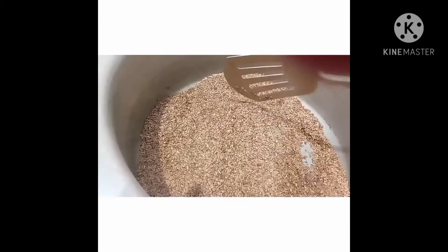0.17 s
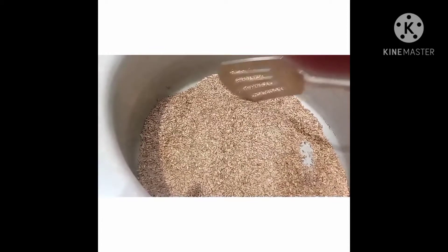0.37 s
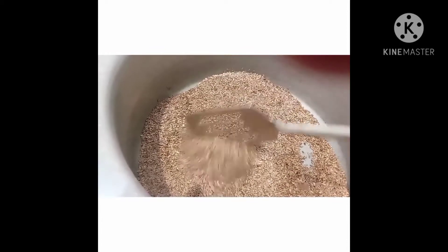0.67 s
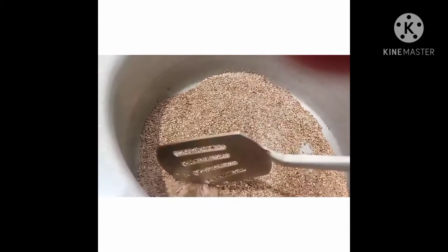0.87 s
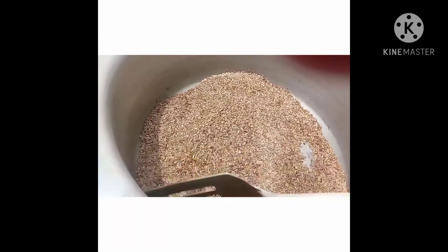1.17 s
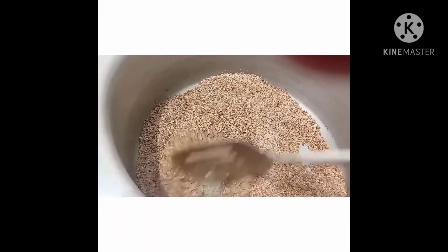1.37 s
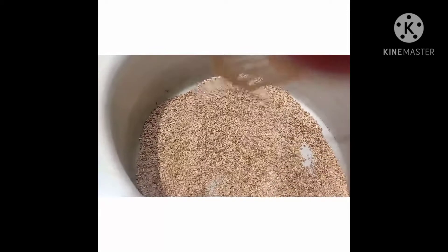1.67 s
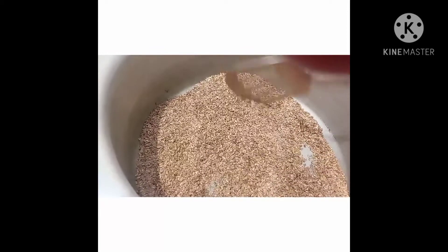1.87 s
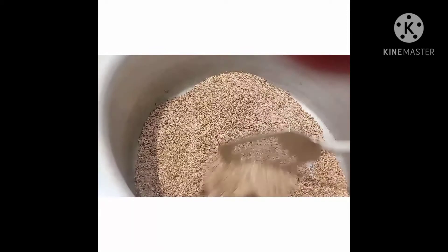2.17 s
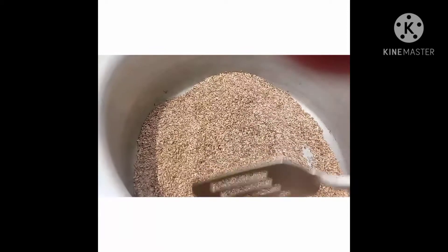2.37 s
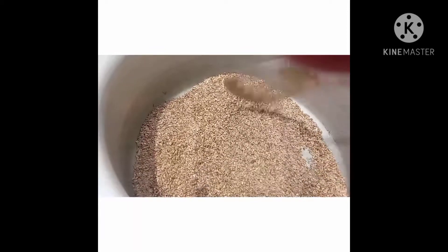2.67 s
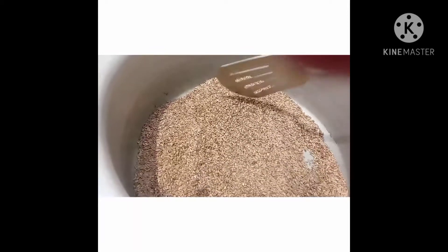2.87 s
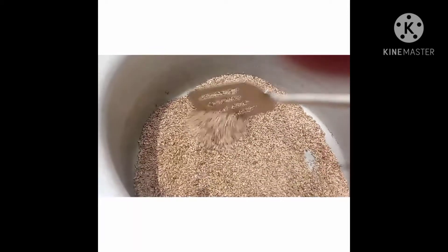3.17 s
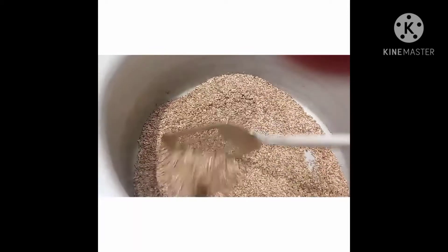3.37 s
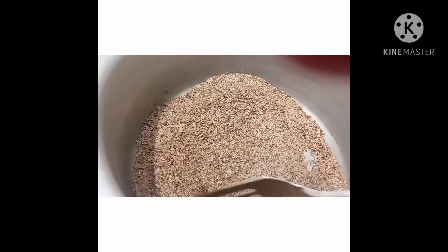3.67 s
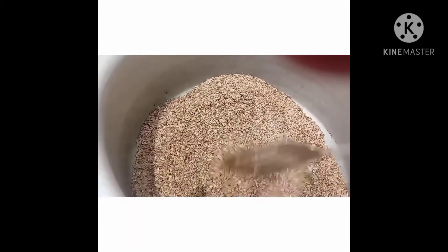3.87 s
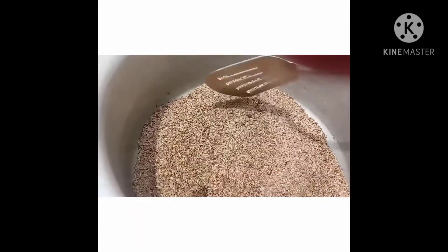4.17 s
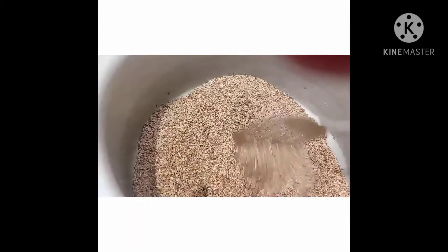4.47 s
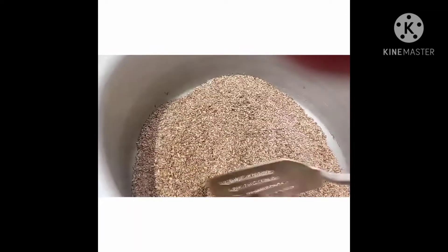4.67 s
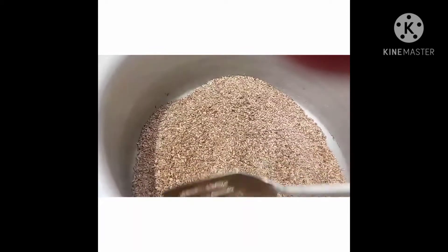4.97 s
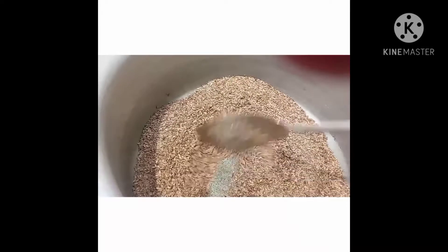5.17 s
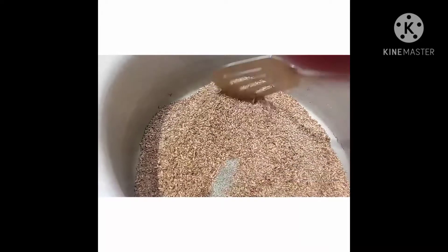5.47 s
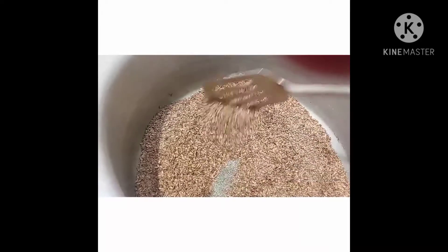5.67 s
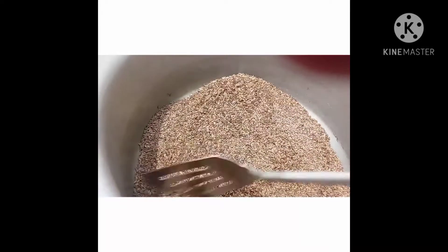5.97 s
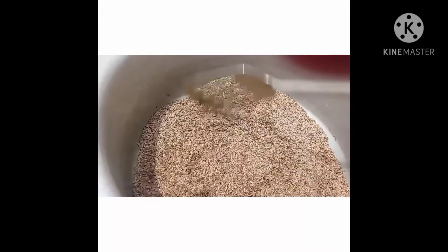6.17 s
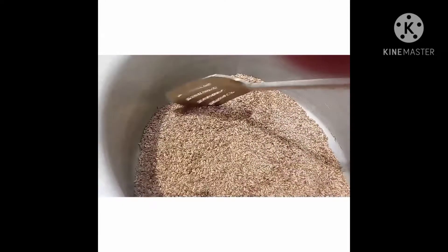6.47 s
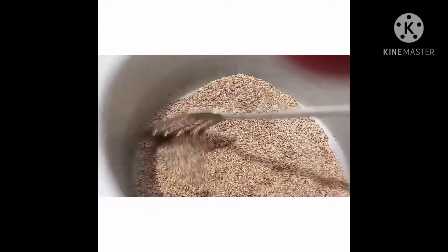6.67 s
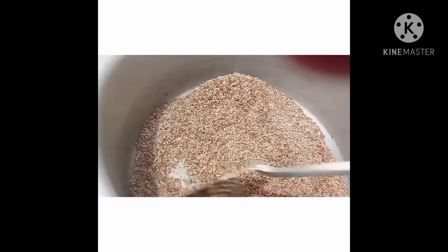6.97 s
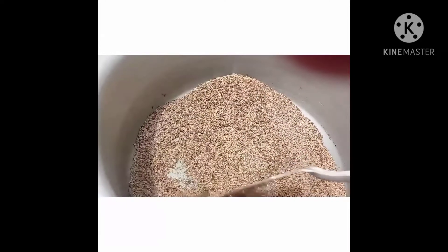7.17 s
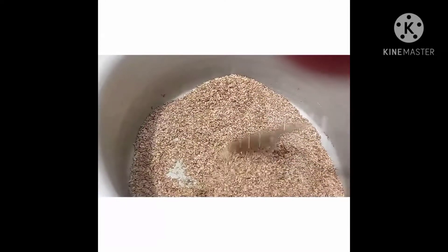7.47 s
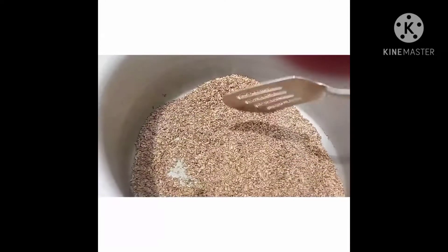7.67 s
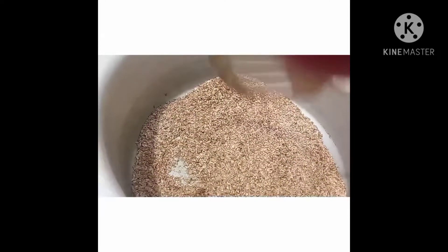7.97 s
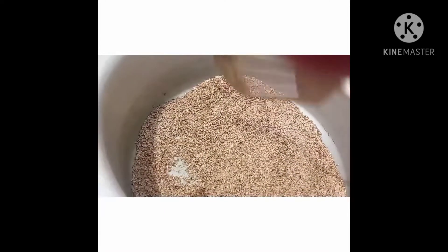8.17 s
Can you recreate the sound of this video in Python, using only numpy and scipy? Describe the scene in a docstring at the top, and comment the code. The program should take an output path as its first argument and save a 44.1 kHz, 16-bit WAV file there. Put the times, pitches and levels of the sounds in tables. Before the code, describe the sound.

Bright snaps and pops come thick and fast from hot seeds close to the microphone, the strongest landing with a little thump. A fine patter of smaller bursts and the gentle hiss of stirred grain fill the gaps. Now and then a metal spatula softly knocks the steel pot, a little more clearly near the end, while the popping keeps going.

```python
"""Seeds roasting in a steel pot

Small seeds burst with short cracks over the hiss of stirred, sliding grain, close under a phone whose
two microphone ports each colour the sound differently. The hardest cracks jolt a capsule's resting
point, which the bass cut turns into a thud. The pot murmurs, and now and then the spatula bumps it."""
import sys
import numpy as np
from scipy import signal
from scipy.fft import rfft, irfft
from scipy.io import wavfile
from scipy.ndimage import uniform_filter1d

SR = 44100
rng = np.random.default_rng(int(sys.argv[2]) if len(sys.argv) > 2 else 0)


def pcm_store(signal):
    """Save signal as 16-bit PCM."""
    levels = np.round(np.clip(np.atleast_2d(signal), -1, 1) * 32767)
    wavfile.write(sys.argv[1], SR, levels.astype(np.int16).T)


N = 366030


def undb(db):
    """Decibels to gain."""
    return 10 ** (np.asarray(db) / 20)


def walk(rate_hz):
    """A random wander: glides to a new level rate_hz times a second, with a spread near 1."""
    hold = int(SR / rate_hz)
    return uniform_filter1d(np.repeat(rng.standard_normal(N // hold + 1), hold), hold)[:N]


def colour(x, response):
    """Filter each channel with its impulse response."""
    return signal.fftconvolve(x, response, axes=1)[:, :x.shape[1]]


def eq_response(curve):
    """A minimum-phase impulse response of unit energy, shaped by (freq_hz, gain_db) points."""
    hz, db = np.transpose(curve)
    grid_hz = np.maximum(np.arange(1025) * SR / 2048, 20)
    cepstrum = irfft(np.log(undb(np.interp(np.log(grid_hz), np.log(hz), db))))
    cepstrum[1:1024] *= 2  # folding the cepstrum makes the response causal
    cepstrum[1025:] = 0
    response = irfft(np.exp(rfft(cepstrum)))[:512]
    return response / np.linalg.norm(response)


# Tone of each microphone port: freq_hz, gain_db
LEFT_PORT_EQ = [(300, -15), (600, -9.5), (1900, -12), (3500, -6.5), (5000, -3.5), (6500, -1), (7700, -8),
                (10500, -3.5), (13300, -7), (14050, -6.5), (14700, 3.5), (15300, 2), (15600, -7)]
RIGHT_PORT_EQ = [(300, -23), (600, -15.5), (1000, -16), (1400, -14.5), (3500, -4), (5000, 2), (6500, 7.5),
                 (7700, -2.5), (11000, -12), (13500, -14.5), (14700, -11.5), (15300, -6), (15600, -18.5)]


def ports():
    """The resonant cavities in front of the left and right capsules."""
    return np.array([eq_response(LEFT_PORT_EQ), eq_response(RIGHT_PORT_EQ)])


# Swell of the stirring: time_s, level_db
STIR_LEVELS = [(0.0, -40.5), (0.51, -40), (1.23, -39), (1.71, -41), (2.22, -41.5), (2.58, -45), (2.68, -35),
               (2.77, -43), (3.26, -41), (3.74, -41.5), (4.76, -42.5), (4.88, -38), (5.36, -44),
               (5.73, -39), (6.17, -43), (6.47, -41.5), (6.91, -41), (7.44, -40.5), (8.3, -40)]


def bustle_db(t):
    """Level of the moving grain: the stirring, lifted where crowds of loud bursts scatter the seeds."""
    scatter_db, scatter_s = 2.5, 0.23
    crowd = sum(np.exp(-((t - start_s) / scatter_s) ** 2) for start_s, _, _ in LOUD_BURSTS)
    return np.interp(t, *np.transpose(STIR_LEVELS)) + scatter_db * (np.sqrt(crowd) - 2)


# Tone of sliding grain, thinner in the bass than a crack: freq_hz, gain_db
GRAIN_EQ = [(200, 1.5), (820, 1.5), (1000, 2), (1300, 0.5), (2500, 12), (12000, 5)]


def sliding_grain():
    """Thousands of seeds slide and tick on each other: a hiss whose bands flicker together and alone."""
    grid_s = np.arange(0, N / SR + .01, .01)
    level_db = np.interp(np.arange(N) / SR, grid_s, bustle_db(grid_s)) + 2.5 * walk(40.)
    ticks = rng.standard_normal((2, N)) * undb(3.0 * walk(600.))
    lows = [signal.sosfilt(signal.butter(2, hz, fs=SR, output="sos"), ticks)
            for hz in (700, 1500, 3000, 8000, 12000)]
    bands = np.diff([0 * ticks, *lows, ticks], axis=0)
    flicker = sum(band * undb(2.8 * walk(35.)) for band in bands)
    hiss = colour(flicker, eq_response(GRAIN_EQ)[None])
    return undb(level_db) * colour(hiss, ports()) * undb([[1.5], [-1.5]])  # leans left


def cracks(starts_s, levels_db, tint_db, rise_ms, snap_ms, tail_ms, tail_db=-8, body_db=0.5):
    """Each burst is a brief swell, a snap, then a short noisy tail, different at each port."""
    length, lead = 700, 150  # samples in a crack, and ahead of its snap
    snap_edge = 1.7  # height of the sharp edge over the noisy body
    tail_lift_db = np.array([[5.5], [0]])  # cracks have a stronger noisy tail on the left
    ms = (np.arange(length) - lead) * 1000 / SR
    octave = np.log2(np.maximum(np.arange(length // 2 + 1) * SR / length, 300) / 300)
    out, cavities = np.zeros((2, N + 900)), ports()
    for start_s, stereo_db in zip(starts_s, levels_db):
        size = np.exp(0.14 * rng.standard_normal())
        tail = undb(tail_db + 3.4 * rng.standard_normal() + tail_lift_db)  # some snap dry, some splutter
        swell = 0.9 * tail * np.exp(-abs(ms) / rise_ms)
        decay = np.exp(-ms / (snap_ms * size)) + tail * np.exp(-ms / (tail_ms * size))
        envelope = np.where(ms < 0, swell, decay)
        # no two husks sound alike: a random tint from octave to octave
        husk_db = tint_db * np.interp(octave, np.arange(7), rng.standard_normal(7))
        tint = undb(husk_db + body_db * (octave < 2.7))
        noise = rng.standard_normal((2, length))
        noise += snap_edge * (ms == 0) * np.sign(noise)
        burst = colour(envelope * irfft(tint * rfft(noise)), cavities)
        burst /= np.sqrt(np.mean(burst[:, 132:220] ** 2, axis=1, keepdims=True))  # 2 ms round the snap
        i = int(start_s * SR)
        out[:, i:i + length] += undb(stereo_db)[:, None] * burst
    return out[:, lead:lead + N]


# The loudest bursting seeds: start_s, left_db, right_db
LOUD_BURSTS = [(0.0089, -16, -16.5), (0.0412, -19.5, -18), (0.0733, -25, -25), (0.0808, -24, -21.5),
               (0.164, -21, -17.5), (0.1684, -27, -17.5), (0.179, -34, -21.0), (0.2088, -22, -14.5),
               (0.248, -23, -15), (0.271, -29, -19.5), (0.3208, -15.5, -13), (0.3608, -26, -19),
               (0.37, -19, -15), (0.4507, -20, -20), (0.5175, -20, -12), (0.5392, -17, -20),
               (0.5529, -29, -26), (0.5756, -22, -19), (0.6016, -24, -14), (0.7385, -20, -16.5),
               (0.798, -23.5, -19.5), (0.822, -24, -18.5), (0.837, -24.5, -21), (0.8507, -43, -25),
               (0.8657, -15.5, -13.5), (0.913, -24, -14.5), (0.9375, -23, -18.5), (0.942, -19, -22.5),
               (0.983, -25, -13.5), (0.9903, -19.5, -30), (1.0157, -33, -23.0), (1.0324, -16.5, -12),
               (1.0595, -18, -17), (1.0749, -19, -15), (1.1158, -18, -15.5), (1.15, -22, -18),
               (1.1833, -24, -19.5), (1.1965, -14, -16), (1.2323, -25.5, -23), (1.253, -16, -12),
               (1.2698, -22, -12.5), (1.2928, -21, -24), (1.3222, -24, -19), (1.3515, -22, -16),
               (1.385, -22, -19.5), (1.4139, -15.5, -11), (1.4297, -22, -17.5), (1.483, -21, -15),
               (1.501, -34, -17), (1.5054, -19, -16), (1.554, -17, -14.5), (1.5647, -30, -19),
               (1.594, -25, -15.5), (1.6367, -22, -19.5), (1.6579, -21, -16), (1.6646, -15.5, -25),
               (1.7532, -31, -15.5), (1.7889, -22, -19.5), (1.812, -22, -16.5), (1.8213, -18, -16),
               (1.8293, -24, -20), (1.8345, -23, -20), (1.844, -15, -17), (1.8577, -25, -13.5),
               (1.9256, -22.5, -19.5), (1.945, -29, -18), (1.9668, -22, -17.5), (2.0229, -17, -16.5),
               (2.0402, -23, -16), (2.097, -27, -20.5), (2.104, -20, -19.5), (2.143, -32.5, -21),
               (2.1506, -23, -18), (2.1644, -17, -15.5), (2.1783, -23, -18), (2.1849, -21, -16.5),
               (2.2233, -24, -18), (2.232, -16, -19), (2.239, -21, -15.5), (2.248, -30, -16.5),
               (2.263, -33, -19.5), (2.317, -19.5, -21), (2.356, -33, -21.5), (2.363, -30, -14.5),
               (2.3882, -33, -16.5), (2.3983, -33, -22.5), (2.4202, -22, -15), (2.4595, -35, -17),
               (2.473, -25.5, -18.5), (2.5718, -33, -21.5), (2.6046, -18.5, -15.5), (2.719, -34, -16.5),
               (2.7304, -23, -19), (2.7454, -23, -15.5), (2.8091, -20, -19), (2.8333, -25, -23),
               (2.8671, -20, -12.5), (2.884, -16.5, -21), (2.8892, -33, -22), (2.9045, -21, -17.5),
               (2.9388, -23, -18), (2.954, -21, -19), (2.9825, -40, -21.5), (3.0136, -31, -18),
               (3.0542, -17.5, -12.5), (3.058, -29, -25), (3.0792, -28, -16.5), (3.09, -20, -17),
               (3.1088, -27, -22), (3.129, -17, -16), (3.144, -24, -18), (3.1618, -39, -20),
               (3.192, -24, -14.5), (3.1992, -16, -21), (3.2072, -21, -18), (3.2163, -23, -18.5),
               (3.2756, -33, -25), (3.29, -21, -20), (3.309, -24, -18), (3.3174, -23, -24),
               (3.342, -23.5, -14.5), (3.362, -15.5, -12), (3.4034, -18.5, -16), (3.43, -25.0, -23),
               (3.435, -39, -19), (3.4585, -17, -16.5), (3.485, -22, -20.0), (3.5012, -28, -24),
               (3.5059, -16.5, -16), (3.5702, -17, -25), (3.5904, -24, -19.5), (3.6796, -18.5, -17),
               (3.702, -19.5, -15.5), (3.772, -35, -18), (3.7944, -20, -15), (3.8287, -23, -18.5),
               (3.838, -30, -21), (3.8775, -40, -25), (3.939, -45, -19), (3.9519, -24.5, -20),
               (3.9804, -26, -14), (3.991, -24, -22), (4.0165, -26, -17.5), (4.034, -17, -21),
               (4.0414, -21, -18), (4.085, -17, -15), (4.153, -29, -21.5), (4.1783, -27, -22),
               (4.2089, -14, -13), (4.25, -19.5, -13.5), (4.2542, -21, -16), (4.261, -25, -16.5),
               (4.275, -23.0, -17), (4.346, -17.5, -17.5), (4.3614, -21, -21.5), (4.3887, -24, -20),
               (4.423, -21.5, -19.5), (4.437, -25, -16.5), (4.471, -22.5, -19), (4.4792, -19, -18),
               (4.499, -21, -24), (4.5059, -26.0, -18), (4.5487, -28, -18), (4.6221, -25, -16),
               (4.6424, -19, -15.5), (4.686, -29, -23), (4.69, -16, -14), (4.6944, -22, -10),
               (4.701, -17, -17), (4.725, -24.5, -23), (4.7387, -18, -16.5), (4.7753, -20, -20),
               (4.7904, -24.0, -21), (4.8078, -26, -15), (4.817, -26, -19), (4.8275, -18.5, -15.5),
               (4.8511, -21, -15.5), (4.8754, -29, -14.5), (4.891, -24, -19), (4.9016, -31, -19),
               (4.9211, -33, -16.5), (4.9728, -24.0, -24), (4.986, -19, -12.5), (5.011, -19, -36),
               (5.0182, -29, -17), (5.0576, -16, -16.5), (5.084, -29, -22), (5.122, -17.5, -16.5),
               (5.1599, -14, -13.5), (5.164, -31, -18.5), (5.1776, -18, -14.5), (5.186, -28, -21),
               (5.1971, -14.5, -20.5), (5.243, -18, -20), (5.2457, -33, -18.5), (5.257, -35, -22),
               (5.2694, -24, -20), (5.2814, -16.5, -18), (5.2895, -22, -31), (5.317, -24, -17.5),
               (5.3297, -25, -24), (5.4034, -22, -15.5), (5.4085, -26, -18), (5.4154, -22.5, -15.5),
               (5.4503, -34, -16), (5.4587, -18.5, -21), (5.484, -21.5, -18), (5.5171, -16.5, -12),
               (5.521, -22, -17.5), (5.549, -16, -18), (5.581, -33, -26), (5.599, -17.5, -17),
               (5.6128, -16, -15), (5.622, -12, -16), (5.6325, -23, -15), (5.641, -15, -13.5),
               (5.663, -17, -23), (5.6737, -23.0, -17.5), (5.726, -21.5, -19), (5.73, -17, -17),
               (5.784, -24, -17.5), (5.817, -30, -18), (5.832, -24, -26), (5.8346, -20, -21),
               (5.8437, -22, -16), (5.848, -21.0, -19), (5.8655, -14, -17), (5.87, -25, -18),
               (5.876, -31, -22.5), (5.915, -21.0, -17.5), (5.9222, -28, -13), (5.9256, -14.5, -11.5),
               (5.9792, -34, -20), (6.0111, -33, -22.5), (6.0327, -34, -22), (6.047, -23, -18.5),
               (6.06, -23, -17.5), (6.1142, -19, -11.5), (6.1741, -21.5, -18.5), (6.205, -21, -21.5),
               (6.246, -19, -14), (6.2848, -31, -19), (6.2955, -17, -12.5), (6.318, -17.5, -16),
               (6.351, -21, -20), (6.363, -30, -22), (6.3736, -19, -13.5), (6.386, -22, -24),
               (6.396, -22, -18.5), (6.425, -19, -12), (6.444, -26, -23), (6.4816, -22, -26),
               (6.5059, -19, -17), (6.512, -33, -20.5), (6.5266, -22, -17), (6.5612, -21, -19.5),
               (6.5729, -24, -14), (6.601, -31, -22.5), (6.632, -30, -21.5), (6.641, -17, -13.5),
               (6.6472, -17, -19), (6.6603, -19, -14), (6.6751, -17, -16), (6.692, -21, -18.5),
               (6.746, -21.5, -18), (6.8124, -25, -13.5), (6.8476, -31, -18), (6.926, -19, -14.5),
               (6.936, -19, -21), (6.9476, -21, -18.5), (6.962, -21, -25), (6.9959, -19.5, -15),
               (7.0674, -19, -14.5), (7.1342, -20, -16), (7.168, -23, -16), (7.178, -15.5, -12.5),
               (7.191, -28, -17.5), (7.1948, -25, -30), (7.2107, -24, -26), (7.215, -38, -20.0),
               (7.2241, -22, -17.5), (7.329, -41, -15), (7.3447, -41, -19), (7.35, -34, -20),
               (7.3804, -30, -18), (7.3843, -35, -19), (7.4108, -21, -27), (7.42, -31, -18),
               (7.4247, -19, -14), (7.433, -20, -24), (7.46, -38, -26), (7.4702, -43, -23.5),
               (7.513, -25, -20), (7.531, -25, -17), (7.545, -19.5, -21.5), (7.563, -34, -21),
               (7.61, -37, -17), (7.6232, -23, -25), (7.647, -28, -15.5), (7.6704, -12.5, -12),
               (7.6806, -18, -15), (7.7397, -21, -19.5), (7.8161, -24, -13.5), (7.8537, -29, -19),
               (7.9336, -28.5, -16), (7.9634, -18, -15), (8.02, -29, -22), (8.028, -22, -14),
               (8.0379, -18, -16), (8.0982, -38, -14), (8.109, -30, -17.5), (8.13, -21, -24),
               (8.136, -37, -22), (8.154, -15, -12.5), (8.173, -20, -20), (8.1931, -17, -16.5),
               (8.2431, -22, -16.5), (8.2888, -27, -16.5)]


def loud_seeds():
    """Hot seeds burst with sharp foreground cracks."""
    bursts = np.array(LOUD_BURSTS)
    return cracks(bursts[:, 0], bursts[:, 1:], tint_db=3.0, rise_ms=1.3, snap_ms=0.4, tail_ms=2.8)


def small_seeds():
    """A random patter of small bursts, louder as the grain moves, with flurries round the loud ones."""
    bursts_per_s, lift_db = 55., 4.0
    flurry_share, flurry_s = .6, .03
    count = int(bursts_per_s * N / SR)
    spread = rng.standard_normal((count, 3))
    place, leader, alone = rng.random((count, 3)).T
    leader_s = np.array(LOUD_BURSTS)[(leader * len(LOUD_BURSTS)).astype(int), 0]
    nearby_s = np.clip(leader_s + flurry_s * (2 * place - 1), 0, (N - 1) / SR)
    starts_s = np.where(alone > flurry_share, place * N / SR, nearby_s)
    seed_db = bustle_db(starts_s)[:, None] + lift_db + 3.7 * np.tanh(spread[:, :1])
    stereo_db = seed_db + 2.8 * spread[:, 1:] + [-3.5, 0]  # scattered, leaning right
    return cracks(starts_s, stereo_db, tint_db=6.0, rise_ms=1.0, snap_ms=0.3, tail_ms=2.2)


# Signed kicks to the capsules' resting points: start_s, left_step_fullscale, right_step_fullscale
CAPSULE_JOLTS = [(0.209, 0.45, -0.02), (0.3199, 0.43, -0.078), (0.539, 0.21, -0.00011),
                 (0.7391, -0.29, 0.0042), (1.0749, 0.27, -0.00069), (1.116, -0.7, -0.083),
                 (1.2701, 0.75, -1.09), (1.3527, -0.46, 0.0), (1.3841, -0.66, 0.0), (1.431, 0.83, 0.0),
                 (1.8577, -1.08, 0.22), (2.0233, 0.71, 0.0), (2.105, 0.64, 0.015), (2.231, -0.05, -0.0061),
                 (2.6053, -0.41, -0.053), (2.7308, -1.25, 0.0), (2.866, 0.4, 0.0029), (3.088, 0.34, 0.0),
                 (3.107, 1.05, 0.0), (3.4587, -0.065, -0.018), (4.2086, 0.58, 0.33), (4.389, -0.86, 0.0),
                 (4.423, 0.36, 0.044), (4.4796, -0.12, 0.012), (4.8177, -0.17, 0.013),
                 (4.8275, -0.24, 0.048), (5.0101, -1.13, 0.0), (5.06, 0.11, -0.009), (5.178, 0.32, 0.05),
                 (5.197, 0.7, 0.14), (5.4858, 0.2, 0.009), (5.518, 0.26, 0.071), (5.6327, 0.53, 0.0),
                 (5.6739, -1.12, 0.0), (5.73, 0.18, 0.0), (5.9148, -0.92, 0.0), (5.9219, 0.87, 0.0),
                 (6.115, 1.08, -0.018), (6.2072, -1, 0.0), (6.2461, 0.94, -0.1), (6.295, -0.94, 0.0),
                 (6.647, -0.83, 0.0), (6.7451, 0.19, 0.0065), (6.947, 0.027, 0.26), (7.4195, 0.87, 0.0),
                 (7.6726, -0.75, 0.29), (7.816, 1.19, 0.0), (8.039, -0.71, 0.0), (8.1293, -1.03, -0.16),
                 (8.1533, 0.64, -0.015), (8.241, 0.084, 0.0)]


def capsule_jolts():
    """A hard crack knocks the membrane to a new resting point; it overshoots, wobbles and settles."""
    rise_ms, overshoot_ms, wobble_ms = .16, 0.2, 1.2
    right_lag_s = .0003  # the right port is a hand's width further off
    steps = np.zeros((2, N))
    for start_s, left, right in CAPSULE_JOLTS:
        steps[0, int(start_s * SR)] += left
        steps[1, int((start_s + right_lag_s) * SR)] += right
    overshoot = 0.17 * signal.lfilter([1], [1, -np.exp(-1000 / (overshoot_ms * SR))], steps)
    pole = np.exp(-1000 / (rise_ms * SR))
    shift = signal.lfilter([1 - pole], [1, -pole], np.cumsum(steps, axis=1) + overshoot)
    fade = signal.lfilter([1], [1, -np.exp(-1000 / (wobble_ms * SR))], steps)
    wobble = signal.lfilter(*signal.butter(2, 1700, fs=SR), rng.standard_normal((2, N)))
    return shift + 0.45 * fade * wobble


# Spatula knocks on the pot: start_s, level_db, pitch_hz
SPATULA_BUMPS = [(0.666, -51, 122), (2.669, -51, 121), (3.608, -54, 1000), (3.734, -51, 340),
                 (7.282, -47, 120), (7.489, -50.5, 119), (7.779, -43, 118)]


def spatula_bumps():
    """The heavy pot answers each soft bump with one damped mode."""
    attack_s, t60_s = 0.0087, 0.26
    ring = np.zeros(N)
    for start_s, level_db, pitch_hz in SPATULA_BUMPS:
        age_s = np.maximum(np.arange(N) / SR - start_s, 0)
        envelope = (1 - np.exp(-age_s / attack_s)) * np.exp(-np.log(1000) * age_s / t60_s)
        ring += undb(level_db) * envelope * np.sin(2 * np.pi * pitch_hz * age_s)
    return ring * undb(7.5 * walk(99.0))  # the spatula drags, so the ring is uneven


def pot_murmur(pitch_hz, q, level_db, waver_db, waver_hz):
    """A resonance of the pot, kept faintly sounding under the bumps by the moving grain."""
    ring = signal.lfilter(*signal.iirpeak(pitch_hz, q, fs=SR), rng.standard_normal(N))
    return undb(level_db + waver_db * walk(waver_hz)) * ring / np.std(ring)


def scene():
    """Crackle, hiss and jolts in stereo, with the pot in the centre."""
    crackle = loud_seeds() + small_seeds()
    power = np.mean(crackle ** 2, axis=0)
    crackle_rms = np.sqrt(abs(uniform_filter1d(uniform_filter1d(power, 700), 700)))
    hiss = sliding_grain() / (1 + 18 * crackle_rms)  # ducks for about 30 ms round each loud crack
    jolts = capsule_jolts()
    bumps = spatula_bumps()
    lowest_mode = pot_murmur(pitch_hz=119, q=4.5, level_db=-78.5, waver_db=3.1, waver_hz=2.78)
    hollow_air = pot_murmur(pitch_hz=1000, q=1000 / 180, level_db=-68.5, waver_db=3.2, waver_hz=12.)
    return crackle + hiss + jolts + bumps + lowest_mode + hollow_air


def record(dry):
    """The phone: two bass cuts, hard clipping, faint low circuit noise and a steep treble roll-off."""
    bass_cuts = np.vstack([signal.butter(2, hz, "high", fs=SR, output="sos") for hz in (70., 92.)])
    x = np.clip(signal.sosfilt(bass_cuts, dry), -1, 1)
    circuit_noise = signal.lfilter(*signal.butter(3, 80, fs=SR), rng.standard_normal(x.shape))
    x = x + undb(-51.0) * circuit_noise
    x = signal.sosfiltfilt(signal.butter(16, 15600, fs=SR, output="sos"), x)
    return signal.sosfilt(signal.ellip(10, .2, 80, 16700, fs=SR, output="sos"), x)


dry = scene()
out = record(dry)
pcm_store(out)
```